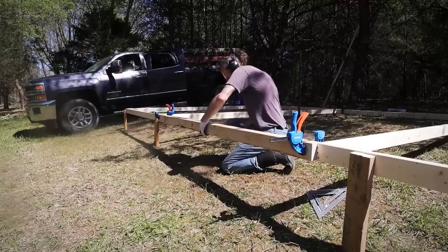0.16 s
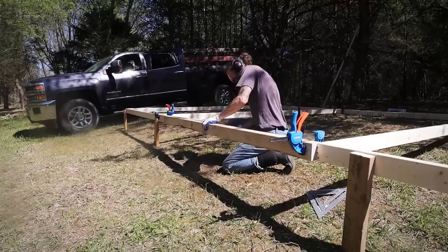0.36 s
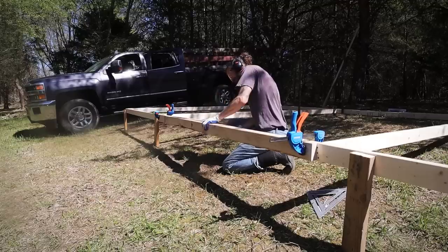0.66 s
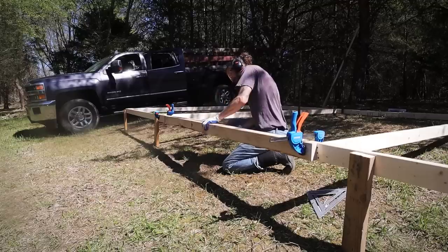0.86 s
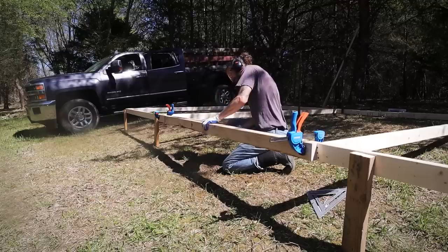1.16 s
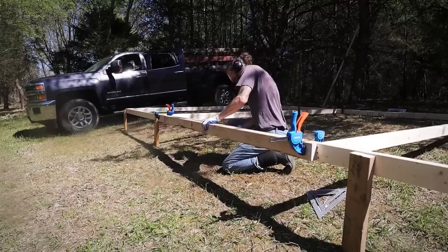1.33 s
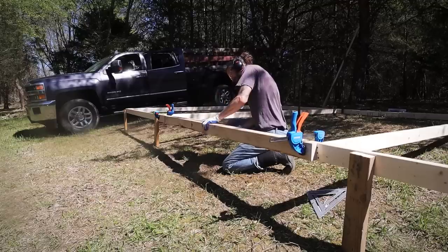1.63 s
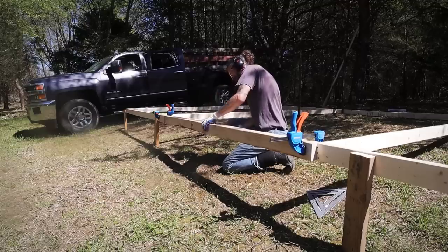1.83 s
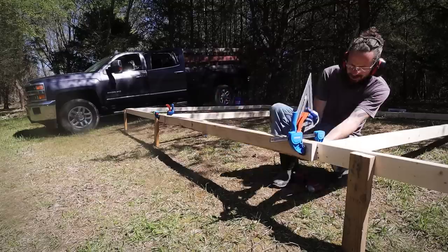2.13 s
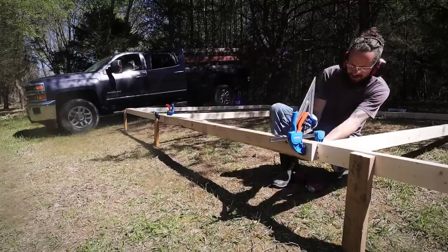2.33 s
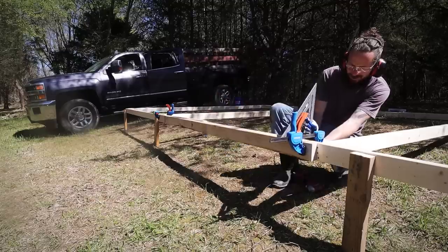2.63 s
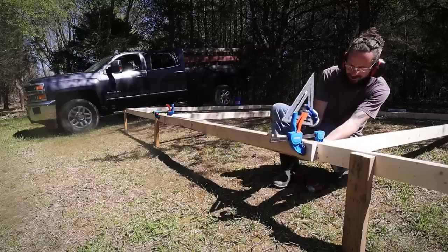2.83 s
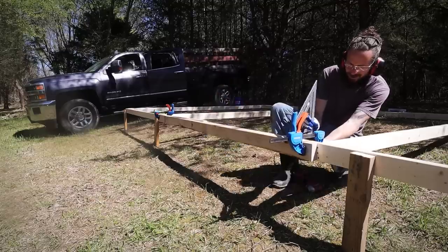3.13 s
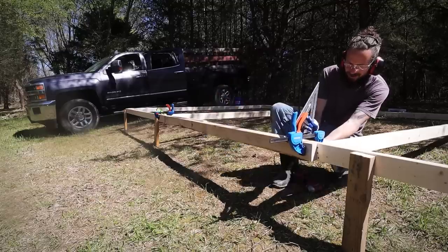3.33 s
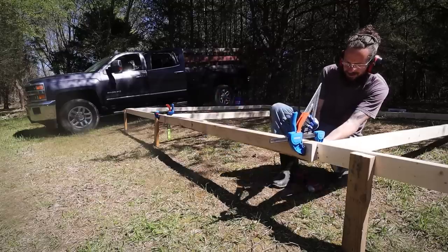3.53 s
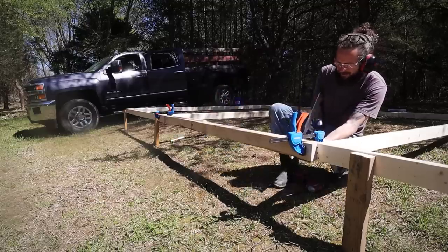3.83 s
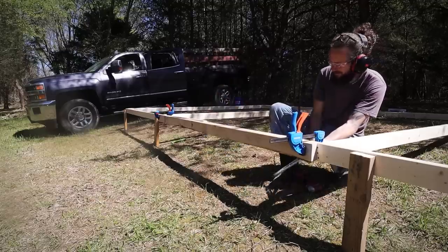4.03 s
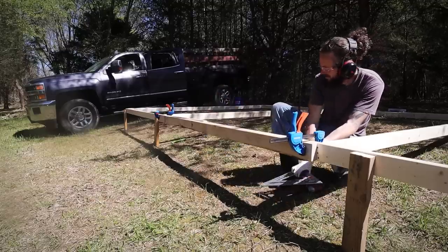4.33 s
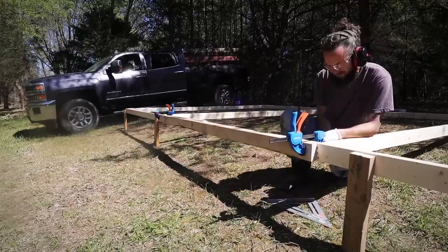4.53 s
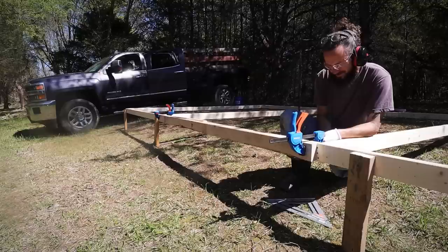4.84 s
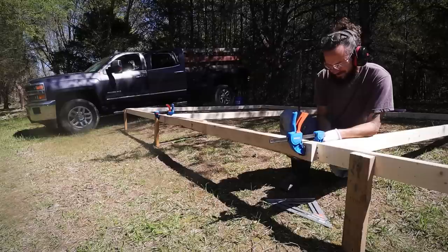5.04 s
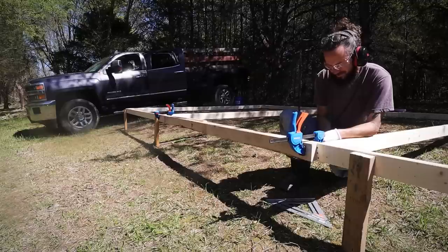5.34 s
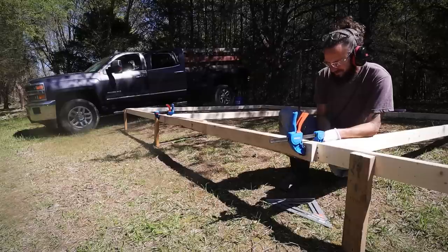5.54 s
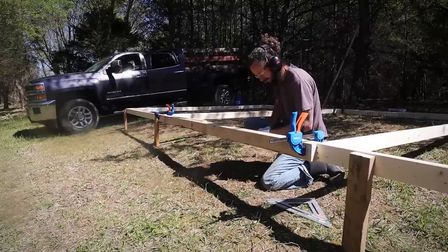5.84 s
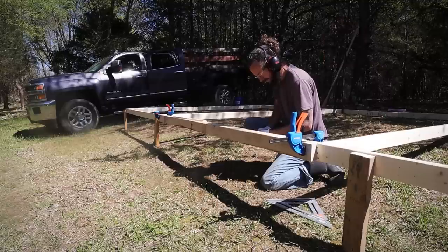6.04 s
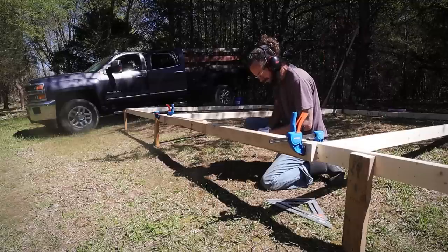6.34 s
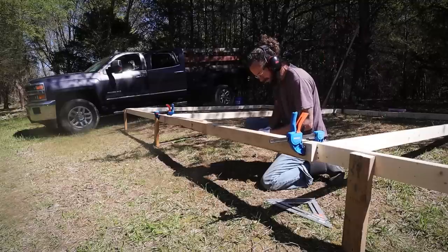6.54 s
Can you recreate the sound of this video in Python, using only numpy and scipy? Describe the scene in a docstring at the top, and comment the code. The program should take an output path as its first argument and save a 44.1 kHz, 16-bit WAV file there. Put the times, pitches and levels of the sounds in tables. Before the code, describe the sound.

Harsh, fast metallic ratcheting of an impact driver on lumber, broken by three ringing knocks and a motor whirr, echoing off nearby trees.

```python
"""An impact driver sinks screws into a timber frame, outdoors before one mono microphone, in short bursts.
Work goes from the far joint to the near one, then the middle one. At trigger pulls the drive whistles and the
motor spins up; in most bursts a hammer of about 50 blows a second makes tool, boards and frame ring.
In a pause a board is knocked flush with a metal square; clothes rustle on dry grass and tools tap.
A wood's edge echoes the work over a faint low hum."""
import sys
import numpy as np
from scipy import signal
from scipy.fft import rfft, irfft
from scipy.io import wavfile
from scipy.ndimage import uniform_filter1d, minimum_filter1d

SR = 44100
rng = np.random.default_rng(int(sys.argv[2]) if len(sys.argv) > 2 else 0)


def log_audio(samples):
    """Write samples as a 16-bit WAV file to the path given in sys.argv[1]."""
    # one column per channel
    frames = np.atleast_2d(samples).T
    # limit to full scale, then quantise
    limited = np.clip(frames, -1, 1)
    pcm = np.round(limited * 32767).astype(np.int16)
    wavfile.write(sys.argv[1], SR, pcm)


N = 295029
T = np.arange(N) / SR


def undb(db):
    """Decibels to gain."""
    return 10 ** (np.asarray(db) / 20)


def unit(x):
    """Scale to rms 1."""
    return x / np.sqrt(np.mean(x ** 2))


def attack_unit(x, size=441):
    """Scale the first 10 ms to rms 1."""
    return x / np.sqrt(np.mean(x[:size] ** 2))


def fade(t, t60):
    """Exponential decay by 60 dB in t60 seconds."""
    return np.exp(-np.log(1000) * t / t60)


def add(out, s, x):
    """Mix x into out from time s."""
    i = max(int(s * SR), 0)
    out[i:i + len(x)] += x[:max(N - i, 0)]


def band(x, hz, kind, order=2):
    """Butterworth filter."""
    sos = signal.butter(order, np.clip(hz, 1, SR / 2 - 1), kind, fs=SR, output="sos")
    return signal.sosfilt(sos, x)


def colour(x, points, size=2048):
    """Minimum-phase filter that follows (frequency [Hz], level [dB]) points."""
    hz, db = np.transpose(points)
    bin_hz = np.arange(size // 2 + 1) * SR / size
    log_gain = np.log(undb(np.interp(np.log(bin_hz + 1), np.log(hz), db)))
    # folding the cepstrum forward makes the filter causal
    cepstrum = irfft(log_gain)[:size // 2]
    cepstrum[1:] *= 2
    response = irfft(np.exp(rfft(cepstrum, size)))
    return signal.fftconvolve(x, response)[:len(x)]


def resonate(x, peaks):
    """Parallel resonances; the grip of the hand damps (widens) them all a little more."""
    out = 0
    for hz, width, db in peaks:
        b, a = signal.iirpeak(hz, hz / (width + hz / 60), SR)
        out = out + undb(db) * signal.lfilter(b, a, x)
    return out


def ring(modes, t):
    """Free ringing of struck modes: decaying sines in random phase."""
    out = 0
    for hz, db, t60 in modes:
        out = out + undb(db) * fade(t, t60) * np.sin(2 * np.pi * hz * t + rng.uniform(0, 2 * np.pi))
    return out


def walk(rate):
    """Smooth random wandering below rate [Hz], rms 1."""
    return unit(band(rng.standard_normal(N), rate, "low"))


def burst(t, hold_s, t60):
    """Chattering contact: noise that holds briefly, then dies."""
    return rng.standard_normal(len(t)) * fade(np.maximum(t - hold_s, 0), t60)


# distant hum and air at the microphone: (frequency [Hz], relative level [dB])
AIR_COLOUR = [(25, -26.5), (60, -7.5), (150, 0), (400, -9), (1100, -10.5), (3800, -17), (15000, -30.5)]


def quiet_air(level_db=-60):
    """Distant hum and air: noise, mostly low, whose level wanders by about 1 dB."""
    air = unit(colour(rng.standard_normal(N), AIR_COLOUR))
    return air * undb(level_db + 1.0 * walk(3.6))


def echo(x):
    """Quick scatter from ground and frame, then a long thin echo from the trees at the wood's edge."""
    t = T[:SR + SR // 2]
    near_noise = burst(t, .01, 0.22) * (t > .012)
    near = colour(near_noise, [(100, 13.5), (500, 8.5), (2000, -6), (5000, -7.0), (9000, -5.5), (15000, -20.5)])
    tree_noise = burst(t, .05, 0.9) * (t > .05)
    trees = colour(tree_noise, [(100, -3), (450, 2), (900, -10), (1900, 0.5), (3500, -5.0), (7000, -5.5),
                                (15000, -40)])
    response = (undb(-15) * unit(near) + undb(-30.5) * unit(trees)) / np.sqrt(len(t))
    return undb(-3.5) * signal.fftconvolve(x, response)[:N]


# clothes and knees shifting on dry grass: (time [s], relative level [dB])
SHUFFLE = [(3.52, -67), (3.585, -56.5), (3.625, -50), (3.66, -58), (3.70, -48), (3.755, -50), (3.84, -67)]
# colour of that rustle: (frequency [Hz], relative level [dB])
SHUFFLE_COLOUR = [(59, -32), (100, -48.5), (169, -12), (231, 2.5), (279, -24), (337, 1), (383, -6.5),
                  (962, -8.5), (1260, -10), (15000, -35)]


def shuffle():
    """Rustle of a shift in posture: coloured noise made grainy by fast level wandering."""
    s, db = np.transpose(SHUFFLE)
    grains = rng.standard_normal(N) * undb(2.1 * walk(137))
    level = undb(np.interp(T, s, db) + 3.5)
    return unit(colour(grains, SHUFFLE_COLOUR)) * level * (T > s[0]) * (T < s[-1])


# small taps and bumps of tools and knees: (time [s], level [dB], centre frequency [Hz])
TAPS = [(0.396, -55, 1450), (1.984, -53.5, 1300), (3.615, -53, 326), (3.693, -49, 190), (3.743, -50, 550),
        (4.359, -56, 1450)]


def taps():
    """Light touches: short noise in a two-octave band."""
    t, out = T[:SR // 10], np.zeros(N)
    for s, db, hz in TAPS:
        tap = band(burst(t, 0.0045, .05), [hz / 2, hz * 2], "bandpass", order=1)
        add(out, s, undb(db) * attack_unit(tap))
    return out


# knocks of the square on the board: (time [s], contact level [dB], relative metal ring level [dB])
KNOCKS = [(2.276, -9, -6), (2.707, -8.5, -3.5), (3.095, -6, -6.5)]
# contact colour, one list for each knock: (frequency [Hz], relative level [dB])
KNOCK_COLOURS = [
    [(35, -72), (60, -39.5), (372, -10.5), (551, -11.5), (695, -1), (1240, -24), (1920, -18), (2840, -33.5),
     (3420, -30.5), (15000, -54.5)],
    [(35, -65), (60, -29), (120, -25.5), (170, -12), (428, 1.5), (960, -2.5), (1240, -8.5), (2360, -11.5),
     (2530, -10), (3270, -18), (8820, -30.5), (15000, -55)],
    [(35, -59), (60, -25), (120, -25), (170, -15), (450, -6), (695, -1.5), (1010, 1), (1210, -10),
     (1360, 1), (1560, -3.5), (2780, -12), (7000, -27), (15000, -46)],
]
# what a knock rings in the board: (frequency [Hz], level before the high-pass [dB], t60 [s])
BOARD_MODES = [(163, -42, .35), (246, -33, .25), (335, -33, .25), (385, -26, .08), (452, -27, .28),
               (495, -21, .07), (570, -29, .18), (690, -19, .06), (870, -27, .1), (974, -24, .12)]
# what it rings in the square: (frequency [Hz], relative level [dB], t60 [s])
SQUARE_MODES = [(1362, -23, 0.29), (1349, -27, 0.36), (1710, -35.5, 0.25), (1790, -31, 0.29),
                (2080, -34, 0.089), (2620, -38, 0.13), (3300, -38.5, 0.17), (6700, -44.5, 0.094),
                (8150, -54, 0.19), (8295, -54.5, 0.26)]
# the square's longest ring: (frequency [Hz], level [dB], t60 [s])
SQUARE_HUM = [(1374, -56, 2.2)]


def knocks(lifted_s=1.9):
    """A dull blow of contact noise on the board; board and metal square ring on as decaying modes."""
    t, out = T[:SR], np.zeros(N)
    for (s, db, metal_db), points in zip(KNOCKS, KNOCK_COLOURS):
        dull_tail = band(burst(t, 0.018, 0.23), 3400, "low", order=1)
        contact = burst(t, 0.0061, 0.03) + undb(-23.5) * dull_tail
        add(out, s, undb(db) * attack_unit(colour(contact, points)))
        rings = ring(BOARD_MODES, t) + undb(metal_db) * ring(SQUARE_MODES, t) + ring(SQUARE_HUM, t)
        # the high-pass keeps the random-phase starts of the rings from thumping
        add(out, s, band(rings * np.minimum(t / .002, 1), 130, "high"))
    # the square sings faintly as it is lifted
    add(out, lifted_s, ring(SQUARE_HUM, t) * np.minimum(t / 0.035, 1))
    return out


# motor and gear whine: (multiple of the rotor speed, relative level at the far joint [dB],
# relative level held in the air [dB], relative level turning a screw [dB], pitch wobble [share])
WHINE = [(3, -5.5, -4.5, 1, .002), (4.67, -12, -3, 1, 0.005), (6, -0.5, -1.5, -1, .001),
         (9.3, -25, 1.5, -4.5, 0.028), (12, -14, -28, -20, .004), (14, -28.5, -17, -11.5, .008),
         (15, -35, -11.5, -29, 0.0088), (18.2, -22.5, -17.5, -21, 0.0087)]
_, FAR_WHINE_DB, AIR_WHINE_DB, SCREW_WHINE_DB, _ = np.transpose(WHINE)


def motor(rotor_hz, whine_db, rattle_db):
    """Whine at multiples of the rotor speed, with a rattle that swells once a turn; rms 1."""
    turns = np.cumsum(rotor_hz * (1 + .007 * walk(250))) / SR
    # play between the teeth blurs some partials more than others
    play = np.cumsum(rotor_hz * walk(400)) / SR
    whine = 0
    for (multiple, *_, wobble), db in zip(WHINE, whine_db):
        partial = np.sin(2 * np.pi * multiple * (turns + wobble * play))
        whine = whine + undb(db) * (1 + 0.4 * walk(43)) * partial
    rattle = rng.standard_normal(N) * (1 + 1.2 * np.sin(2 * np.pi * turns)) * undb(2 * walk(90))
    rattle = colour(rattle, [(150, -19), (500, -6.5), (900, 1.5), (2300, 1.5), (3100, -4.0), (4400, -7.5),
                             (6000, -14), (9000, -20), (15000, -40.5)])
    return unit(unit(whine) + undb(rattle_db) * unit(rattle))


def spin(curve, whine_db, rattle_db):
    """A stretch of free running: the motor follows curves of rotor speed and level."""
    s, hz, db = np.transpose(curve)
    running = motor(np.interp(T, s, hz), whine_db, rattle_db)
    return running * undb(np.interp(T, s, db)) * (T >= s[0]) * (T < s[-1])


# motor free of the hammer at the far joint: (time [s], rotor speed [Hz], level [dB])
SPIN_FAR = [(0, 456.5, -27.5), (.06, 483, -36.5), (.1, 474, -37), (.15, 475, -35.5), (.18, 432, -37.5),
            (.2, 292.5, -48), (.25, 116, -60)]
# motor held in the air: (time [s], rotor speed [Hz], level [dB])
SPIN_IN_AIR = [(3.965, 300, -56), (4.0, 456.6, -49.5), (4.025, 488, -43.5), (4.06, 507, -42),
               (4.11, 489.5, -36), (4.185, 443.4, -33.5), (4.205, 332.4, -34), (4.23, 198, -45.5),
               (4.28, 120, -52.5)]
# motor turning a screw: (time [s], rotor speed [Hz], level [dB])
SPIN_SCREW = [(5.5, 231.3, -52), (5.54, 265.6, -34.5), (5.58, 379, -32), (5.6, 409, -27.5),
              (5.62, 445, -32), (5.66, 451.6, -29.5), (5.735, 441.7, -28), (5.8, 416, -34)]


def free_running():
    """Three stretches of the motor running free of the hammer, each with its own whine balance."""
    return (spin(SPIN_FAR, FAR_WHINE_DB, rattle_db=0)
            + spin(SPIN_IN_AIR, AIR_WHINE_DB, rattle_db=0.0)
            + spin(SPIN_SCREW, SCREW_WHINE_DB, rattle_db=-3.0))


# trigger pulls: (pressed at time [s], released at time [s], relative whistle and growl level [dB])
PULLS = [(.39, 0.586, -47.5), (0.818, 1.149, -42.5), (1.353, 1.592, -47.5), (1.643, 1.793, -53),
         (4.399, 4.654, -42.5), (4.818, 5.141, -44.5), (5.302, 5.499, -46.5), (5.994, 6.269, -43),
         (6.313, 6.503, -54)]


def pulls(rise_s=0.046, coast_t60=.15, switch_hz=7750, rotor_hz=430):
    """The switched drive whistles as the trigger goes down; sidebands spread as the rotor gathers speed."""
    t, speed, torque, whistle = T[:SR // 2], np.zeros(N), np.zeros(N), np.zeros(N)
    for pressed, released, db in PULLS:
        held_s = released - pressed
        # share of full speed: a run-up, then coasting after release
        run_up = (1 - np.exp(-(t / rise_s) ** 2)) * fade(np.maximum(t - held_s, 0), coast_t60)
        add(speed, pressed, run_up)
        add(torque, pressed, undb(db) * run_up * (1 - run_up) * (t < held_s))
        beat = 2 * np.pi * np.cumsum(rotor_hz * np.sqrt(run_up)) / SR
        carrier = 2 * np.pi * switch_hz * t
        tone = np.sin(carrier + beat) + .5 * np.sin(carrier - beat)
        add(whistle, pressed, undb(db) * tone * np.minimum(t / .01, 1) * np.exp(-(t / .06) ** 2))
    running = motor(rotor_hz * speed, SCREW_WHINE_DB, rattle_db=3.0)
    # the starting torque makes the gear case growl
    growl = unit(resonate(running, [(2280, 130, 0)]))
    return whistle + undb(-33.0) * speed ** 1.28 * running + undb(14.5) * torque * growl


# runs of hammering: (first blow at time [s], last blow at time [s], rate [blows/s], speed-up [share by which
# the first gaps are longer and the last ones shorter], relative level [dB], first blow against the rest [dB],
# relative treble [dB], time the hammer keeps bouncing [s])
RUNS = [(0, 0.026, 37, 0, -3.5, 0.5, 0.5, .04), (.503, 0.552, 40, -0.025, -3, 2.5, -1, .04),
        (0.854, 0.907, 36, -0.0075, 0, -1.5, 4.5, .07), (0.929, 1.134, 58.5, 0.046, -3, -2, 6.5, 0),
        (1.405, 1.502, 51, 0.048, -3, -3.5, -0.5, .05), (1.703, 1.762, 52, -0.32, -2.5, -1, -0.5, .07),
        (4.451, 4.637, 48.4, -0.013, -1.5, 4.5, 5.5, .05), (4.87, 5.125, 50.8, .12, -3, -2, 3, .08),
        (5.358, 5.473, 53, .03, -3, -9, 0.5, .05), (5.742, 5.776, 57, -.3, -2, 4.5, 4, .05),
        (6.045, 6.189, 55, -0.023, -3.5, 3, 5, .045), (6.384, 6.464, 50.6, 0.052, -1.5, -5.5, 6, .01)]
# single blows outside the steady beat: first catches, closing bounces, last blows as the motor coasts:
# (time [s], relative level [dB], treble [dB])
STRAYS = [(.433, -20.5, -17), (.582, -12.5, -24), (.831, -22.5, -20), (1.142, -7, 9), (1.172, -16.5, -10),
          (1.533, -5, -5.5), (1.557, -20, -14), (1.678, -24, 3), (1.783, -9, -3), (5.134, -3, -4),
          (5.484, -3, -10), (5.799, -7.5, -5), (6.014, 2.5, -2), (6.214, 0.5, -4), (6.225, -1, -4),
          (6.244, -10.5, -1), (6.354, -24, 2), (6.489, -7, -10)]
# chance from blow to blow: timing, strength and brightness
JITTER_S, SCATTER_DB, TREBLE_SCATTER_DB = .0005, 1, 3.2
# the first blow of a run is duller
FIRST_TREBLE_DB = -6.5
# until it settles into step the hammer bounces and strikes again: delay, strength
REBOUND_S, REBOUND_DB = .007, -4


def hammering():
    """All blows as rows (time, level, treble): a beat that gathers or loses speed, bouncing at first."""
    blows = list(STRAYS)
    for first, last, rate, speed_up, db, first_db, treble_db, bounces_s in RUNS:
        along = np.linspace(0, 1, round((last - first) * rate) + 1)
        since = (last - first) * along * (1 + speed_up * (1 - along))
        chance = rng.standard_normal((len(since), 4))
        for t, (late, hard, bright, bounce) in zip(since, chance):
            s = first + t + JITTER_S * late
            level = db + SCATTER_DB * hard + first_db * (t == 0)
            treble = treble_db + TREBLE_SCATTER_DB * bright + FIRST_TREBLE_DB * (t == 0)
            blows.append((s, level, treble))
            if t < bounces_s:
                blows.append((s + REBOUND_S * np.exp(.15 * bounce), level + REBOUND_DB, treble))
    return np.array(blows)


# slow bending modes of the whole frame: (frequency [Hz], relative level [dB], t60 [s])
FRAME_MODES = [(67, -34, 1.8), (122.5, -14.5, 0.81), (138.8, -10, 1.1), (163, -10.5, 0.27),
               (226.5, 4, 0.27), (333.3, -3.5, 0.37), (474, -1, .4)]


def hammer(blows, points, peaks, clank_db, ring_db, frame_db):
    """Each blow makes bit and screw chatter; this rings the tool, the board and, slowly, the frame."""
    t, out, push = T[:SR // 7], np.zeros(N), np.zeros(N)
    # the same jaws meet every time, so the blows are partly alike
    jaws = burst(t, .0045, .018)
    for s, db, treble_db in blows:
        contact = (.3 * jaws + burst(t, .004, .018)) * np.minimum(t / .0012, 1)
        # the wood carries on after the steel has stopped
        contact = contact + undb(-9.5) * band(burst(t, .005, .07), 3200, "low")
        clank = attack_unit(colour(contact, points))
        ringing = attack_unit(resonate(contact, peaks))
        blow = undb(clank_db) * clank + undb(ring_db) * ringing
        # a square hit is brighter than a glancing one
        blow = blow + (undb(treble_db) - 1) * band(blow, 2200, "high", order=1)
        add(out, s, undb(db) * attack_unit(blow))
        # the hammer scrapes over the anvil just before it strikes
        scrape = attack_unit(colour(burst(t, .004, .02), points))
        add(out, s - rng.uniform(.003, .007), undb(db - 17) * scrape)
        # a random sign for each push keeps the frame's low ring from piling up
        add(push, s, undb([db]) * rng.choice([-1, 1]))
    frame_ring = signal.fftconvolve(push, ring(FRAME_MODES, T[:SR]))[:N]
    return out + undb(frame_db) * frame_ring


# colour of a blow at the far, near and middle joints: (frequency [Hz], relative level [dB])
FAR_COLOUR = [(53, -52.5), (90, -35), (130, -13.5), (266, -16.5), (410, -5.5), (543, -16.5), (690, 5),
              (1240, -11), (1570, 0), (1790, -9), (2170, -4), (6150, -27), (8700, -23), (10500, -38.5),
              (16000, -54)]
NEAR_COLOUR = [(53, -95), (90, -79), (176, -43), (219, -4.5), (352, 2.5), (393, -8), (675, 2), (820, 0.5),
               (997, 7), (1130, 2), (1610, 4), (2640, -3.5), (3280, -7.5), (8890, -13.5), (10300, -26.5),
               (14800, -25), (16000, -29)]
MIDDLE_COLOUR = [(53, -38), (90, -32), (330, -3.5), (488, -5.5), (705, 1), (856, 0), (997, -7), (1130, -4),
                 (1710, 4), (1950, -10), (2530, -7), (3010, -14.5), (7970, -19), (14300, -45.5),
                 (16000, -53)]
# resonances of board and tool at each joint: (frequency [Hz], width before the hand's damping [Hz],
# relative level [dB])
FAR_PEAKS = [(668, 180, -1), (1019, 74, 13), (1485, 32, 0.5), (2080, 13, 1.5), (2906, 6.9, -2.5),
             (3180, 150, -11), (3400, 54, 0), (3950, 100, -28), (4870, 150, -32), (8400, 75, -15),
             (8160, 65, -10.5)]
NEAR_PEAKS = [(702, 14, 9), (1000, 57, 10), (1450, 17, 6), (1580, 13, 6.5), (2160, 22, 8.5),
              (2670, 72, 0.5), (3400, 57, -13), (5460, 33, -3), (6260, 69, -37), (7940, 90, -13),
              (8550, 170, -37)]
MIDDLE_PEAKS = [(700, 13, 0.5), (989, 37, 7.5), (1450, 71, -4.5), (1720, 24, -6), (2484, 38, -8.5),
                (3490, 19, -9), (4230, 200, -19), (5010, 65, -19), (6060, 200, -30), (7680, 180, -20.5)]
# the work moves from the far joint to the near one, then to the middle one: (time [s])
JOINT_CHANGES_S = [4, 5.7]


def screws():
    """The hammering at the three joints, each with its own colour, resonances and share of frame."""
    blows = hammering()
    joint = np.searchsorted(JOINT_CHANGES_S, blows[:, 0])
    far, near, middle = (blows[joint == k] for k in range(3))
    return (undb(-10.0) * hammer(far, FAR_COLOUR, FAR_PEAKS, clank_db=8.5, ring_db=5, frame_db=-30.0)
            + undb(-10.0) * hammer(near, NEAR_COLOUR, NEAR_PEAKS, clank_db=8, ring_db=5.0, frame_db=-36.5)
            + undb(-11) * hammer(middle, MIDDLE_COLOUR, MIDDLE_PEAKS, clank_db=5.5, ring_db=4, frame_db=-29.0))


def scene():
    """Quiet air, the echo, knocks and handling, and the driver, summed at one microphone."""
    by_hand = knocks() + shuffle() + taps()
    driver = screws() + pulls() + free_running()
    echoes = echo(driver + undb(-1) * by_hand)
    return (quiet_air() + echoes + by_hand + driver)[None]


def record(dry, ceiling=0.65, release_db_per_s=450, size=89, top_hz=16000):
    """A fast look-ahead limiter holds the peaks and recovers between blows; the top is cut."""
    over_db = 20 * np.log10(np.maximum(np.abs(dry) / ceiling, 1))
    recovery_db = release_db_per_s * T
    gain = undb(recovery_db - np.maximum.accumulate(over_db + recovery_db, axis=-1))
    # the window, in samples, lowers the gain ahead of each peak and smooths it
    gain = uniform_filter1d(minimum_filter1d(gain, size), size)
    top_cut = signal.ellip(10, .2, 80, top_hz, fs=SR, output="sos")
    return signal.sosfilt(top_cut, dry * gain)


dry = scene()
out = record(dry)
log_audio(out)
```